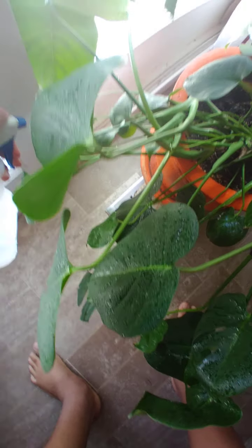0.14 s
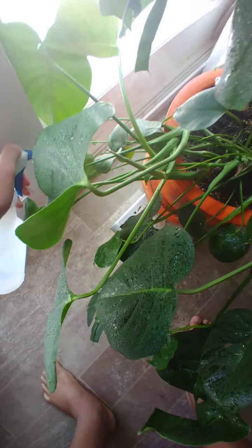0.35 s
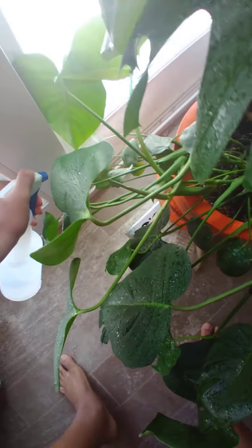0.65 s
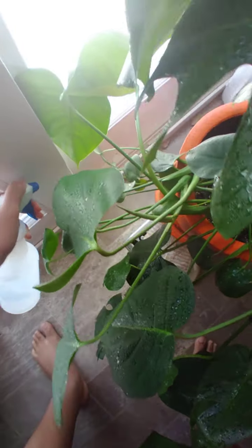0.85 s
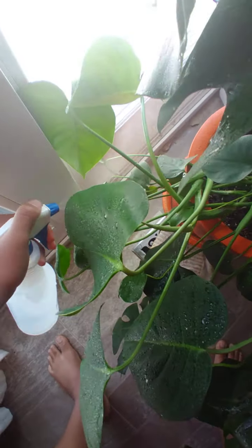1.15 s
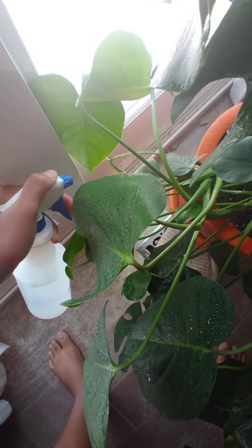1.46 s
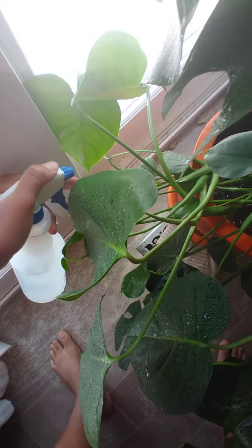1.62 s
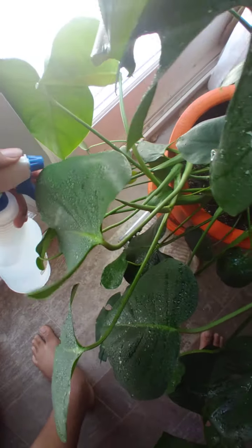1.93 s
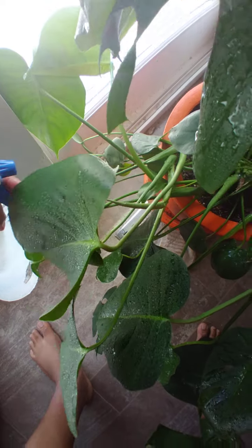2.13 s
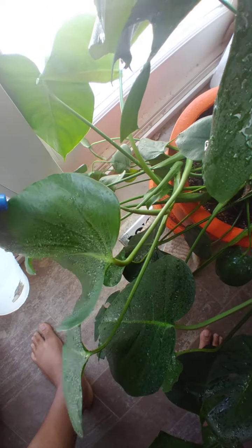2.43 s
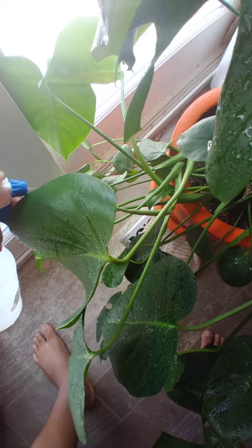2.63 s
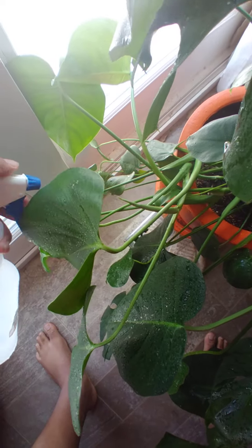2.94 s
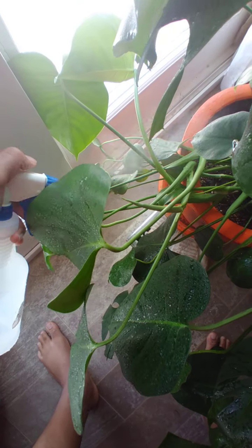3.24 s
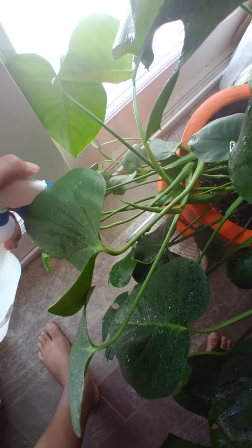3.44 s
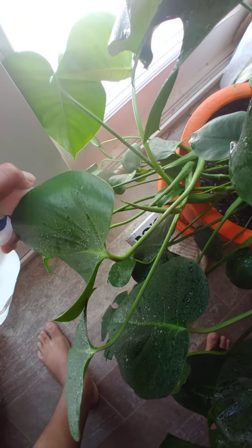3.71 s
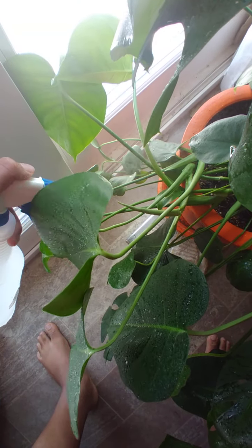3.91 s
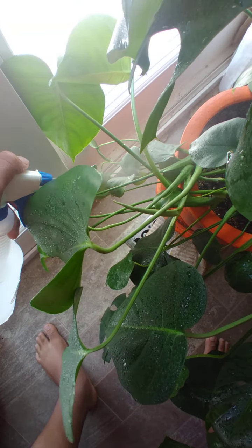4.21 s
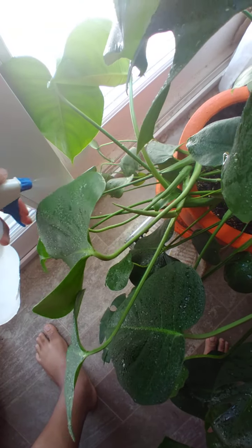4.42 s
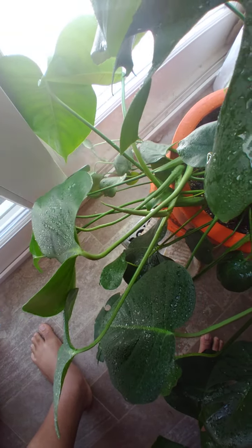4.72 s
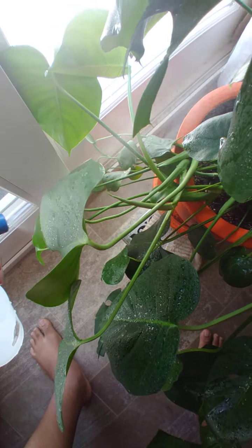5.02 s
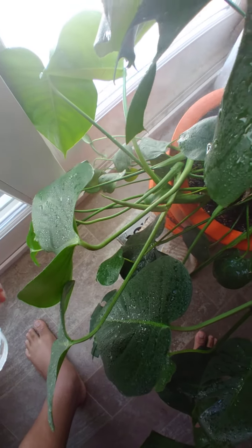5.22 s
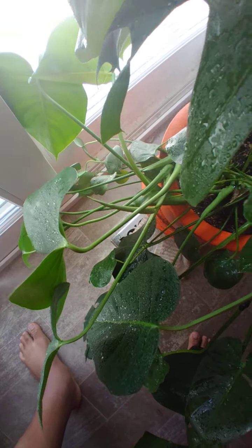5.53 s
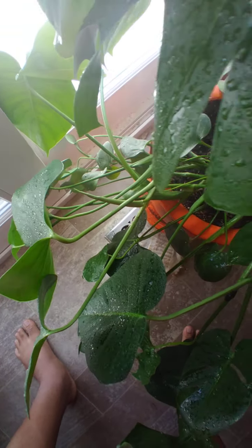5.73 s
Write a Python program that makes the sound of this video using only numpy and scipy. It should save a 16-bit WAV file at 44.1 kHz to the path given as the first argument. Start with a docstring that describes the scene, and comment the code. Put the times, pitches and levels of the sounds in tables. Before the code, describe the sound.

A trigger spray bottle squirts three quick hissing bursts, pauses with small clicks, then six more rapid squirts in a quiet room.

```python
"""A plastic trigger bottle mists house plants near a hand-held phone in a small quiet room.
Each squeeze is coloured noise that swells and sags with pump pressure, peaked where a leaf resonates.
Clicks are noise snaps over damped modes; fizzing and sputtering noise follows pump flow and spits.
Leaves knock (noise humps), low thuds ring as damped modes, the bottle creaks, air puffs mostly at the left port.
Room tone and hum lie beneath, and both microphone ports ring near 9 kHz."""
import sys
import numpy as np
from scipy import signal
from scipy.fft import rfft, irfft, next_fast_len
from scipy.io import wavfile
from scipy.ndimage import map_coordinates

SR = 44100
rng = np.random.default_rng(int(sys.argv[2]) if len(sys.argv) > 2 else 0)


def log_audio(samples):
    """Write samples as a 16-bit WAV file to the path given in sys.argv[1]."""
    # one column per channel
    frames = np.atleast_2d(samples).T
    # limit to full scale, then quantise
    limited = np.clip(frames, -1, 1)
    pcm = np.round(limited * 32767).astype(np.int16)
    wavfile.write(sys.argv[1], SR, pcm)


N = 258426

# Faint noise of the room. Each row: frequency in Hz, relative level in dB.
ROOM_TONE_COLOUR = [(25, -23), (60, 0.5), (110, -16.5), (250, -12.5), (420, -18.5), (900, -26),
                    (2500, -32.5), (5000, -33), (9000, -37.5), (16000, -46)]
# Hum of an appliance. Each row: frequency in Hz, rms level in dB.
HUM_TONES = [(59.7, -84), (236, -91), (296.5, -85.5)]
# Squeezes of the trigger. Each row: start of full flow in seconds, time to peak pressure in seconds,
# length in seconds, relative level in dB, coarse drops in dB, left-right difference in dB before the lean,
# then the resonance of the leaf under the spray: frequency in Hz, width in Hz, height in dB.
SQUEEZES = [ (0.033, 0.083, 0.21, -25.5, -9.5, -2, 2790, 570, 8.5),
            (0.476, .084, 0.19, -26.5, -8, -2, 2830, 700, 4),
            (0.937, 0.099, 0.2, -27, -5.5, -1.4, 1950, 910, -0.5),
            (3.07, 0.088, 0.23, -26, -7.5, -2, 3450, 925, 6.5),
            (3.532, 0.11, 0.25, -27, -5, -1.9, 3240, 1100, 5),
            (3.985, 0.11, 0.21, -26.5, -5, -2.1, 3500, 800, 4),
            (4.414, 0.085, 0.21, -26, -8, -1.7, 5430, 820, 2),
            (4.866, 0.087, 0.21, -24.5, -6.5, -1.6, 3400, 1800, 1.5),
            (5.289, 0.072, 0.22, -27.5, -6.5, 1.2, 1900, 950, 4.5), ]
# Spectrum of the droplets. Each row: frequency in Hz, relative level in dB.
MIST_COLOUR = [(200, -44.5), (450, -33.5), (800, -15), (1300, -7), (2000, 1), (2600, -1.5), (3300, 2.5),
               (4400, 0.5), (5800, 1), (6800, 0.5), (9300, 2), (12000, -2), (14000, -0.5), (16000, -2)]
# Trigger and valve clicks. Each row: start in seconds, relative level in dB, share of the body in dB,
# left-right difference in dB before a common offset and the lean.
CLICKS = [(0.3135, -31, -31, -1), (0.363, -45.5, -40, -14), (0.425, -42, -30, -12.5),
          (0.7317, -28.5, -19, 15), (0.7855, -46, -4, 4), (0.8598, -41.5, -27, 9.5), (1.2168, -31, -45, -5),
          (1.286, -40.5, -15, -2), (1.8451, -39.5, -17, -3), (2.034, -39, -24, 5.5),
          (2.2712, -47, -18, -15), (2.332, -55, -17, -2), (2.4736, -36.5, -18.5, 1),
          (2.601, -46.5, -47, -13.5), (2.9388, -36, -42, -7.5), (2.9872, -57.5, 2, 3),
          (2.9972, -39, -42, -14), (3.371, -27.5, -39, -3), (3.4055, -43, -9, 1), (3.445, -25.5, -34, -2),
          (3.455, -29.5, -26, -6), (3.468, -30, -38, 6), (3.8626, -36.5, -14, -1), (3.895, -40, -18, 5),
          (3.907, -25.5, -26.5, 5.5), (3.921, -29.5, -19, -12), (3.964, -25.5, -37, 6),
          (4.3178, -27, -30, -9), (4.335, -41, -36, -5), (4.6944, -31, -46.5, 8), (4.7524, -39, -39.5, -17),
          (4.7674, -24.5, -32, -2), (5.153, -38, -35, 1), (5.2594, -18, -29, -3.5),
          (5.6415, -49.5, -15, 6.5), (5.66, -37.5, -30, -4), (5.758, -60.5, 3, -5),
          (5.8189, -27.5, -13, -5.5)]
# Spectrum of a click's snap. Each row: frequency in Hz, relative level in dB.
SNAP_COLOUR = [(300, -43), (1100, -21), (1700, -9.5), (5000, 0.5), (9000, 6), (12000, 1), (16000, -0.5)]
# Modes of the spray head. Each row: mean frequency in Hz, mean relative level in dB, t60 in seconds.
SPRAY_HEAD_MODES = [(1570, -2.5, 0.019), (2050, 1.5, 0.015), (2930, -15.5, 0.022), (3980, -8, .012)]
# The pump refilling and weak half strokes. Each row: start in seconds, length in seconds, relative level in dB.
PUMP_STROKES = [(0.333, 0.031, -59.5), (0.773, 0.078, -50), (1.243, 0.041, -57), (1.91, 0.078, -53.5),
                (2.153, 0.056, -67), (2.622, 0.083, -69), (2.808, 0.074, -49), (2.937, 0.032, -65),
                (3.355, 0.081, -57), (4.707, 0.13, -55), (5.548, 0.095, -54.5)]
# Spits of water left in the nozzle. Each row: start in seconds, relative level in dB, t60 in seconds.
SPITS = [(0.734, -35, 0.11), (1.222, -48, 0.068), (2.036, -63.5, 0.19), (2.266, -55, 0.091),
         (5.155, -46, 0.066), (5.263, -50, 0.034)]
# Soft knocks of leaves and bottle. Each row: start in seconds, relative level in dB, pitch in Hz, t60 in seconds.
KNOCKS = [(.612, -42.5, 920, 0.14), (0.637, -42, 1020, 0.16), (0.678, -39.5, 880, 0.093),
          (0.737, -44, 1520, 0.26), (0.83, -52, 913, 0.11), (1.685, -45, 650, 0.039),
          (2.627, -55, 520, 0.072), (3.404, -35.5, 710, 0.024), (3.5, -46, 1290, .04)]
# Low thuds at the phone, from bumps or puffs of air. Each row: start in seconds, relative level in dB.
THUDS = [(0.618, -50), (0.636, -37), (0.651, -34), (0.734, -52), (0.762, -55), (0.803, -58), (1.479, -58),
         (1.586, -59.5), (1.643, -60.5), (1.953, -63), (3.406, -57), (3.499, -59)]
# Modes of the low thuds. Each row: mean frequency in Hz, mean relative level in dB, t60 in seconds.
THUD_MODES = [(69.5, -17, 0.045), (157.6, -1, 0.088), (207.6, 2, 0.092)]
# Air drifting over the ports, one curve per draught. Each row of a curve: time in seconds, relative level in dB.
DRAUGHTS = [
    [(1.4, -101.5), (1.46, -52.5), (1.48, -48), (1.53, -66.5), (1.556, -56.5), (1.694, -59), (1.746, -90),
     (1.78, -86)],
    [(4.76, -73), (4.9, -53), (5.02, -61), (5.078, -77), (5.29, -61.5), (5.304, -54), (5.414, -57),
     (5.448, -62), (5.528, -50.5), (5.546, -57.5), (5.662, -68), (5.758, -60.5), (5.832, -75.5),
     (5.86, -63)],
]
# Spectrum of the moving air. Each row: frequency in Hz, relative level in dB.
PUFF_COLOUR = [(25, -17), (60, 8.5), (100, 4), (160, -10), (260, -11), (450, -39.5), (1200, -42.5),
               (4000, -58)]
# The plastic bottle creaks in the grip. Each row: time of the peak in seconds, relative level in dB.
CREAKS = [(2.164, -69.5), (2.273, -60.5), (2.334, -67.5), (2.481, -64.5), (2.989, -64.5)]
# Spectrum of the creaks. Each row: frequency in Hz, relative level in dB.
CREAK_COLOUR = [(700, -49), (1400, -13.5), (1800, -6.5), (2900, 4.5), (4000, -6), (6000, -6.5),
                (12000, -25)]
# Likeness of the two channels of a noise. Each row: frequency in Hz, correlation from 0 to 1.
LIKENESS = [(200, .8), (1000, 0.26), (2500, 0.17), (6000, 0.17), (12000, 0.22)]
# Stereo lean of the bottle. Each row: frequency in Hz, left-right difference in dB.
BOTTLE_LEAN = [(500, -1.5), (2000, 4), (3500, 1), (5000, -0.5), (7000, -2.5), (9300, -3.5), (12000, -6.5),
               (16000, -3)]
# Decay of the reverberation. Each row: frequency in Hz, t60 in seconds.
WALL_DECAY = [(200, 0.44), (2000, 0.26), (9000, 0.11), (16000, 0.083)]
# Resonances of the left, then the right port. Each row: frequency in Hz, width in Hz, height in dB.
PORT_RESONANCES = [(9140, 2000, 13), (9470, 1260, 15)]

OPEN_DB_PER_S, CLOSE_DB_PER_S = 931, 360  # how fast the valve opens, and how fast the flow dies
SWELL_DB, SAG_DB = 10.5, 9.5  # pressure builds up to its peak, then sags as the piston runs out
COARSE_START_DB, COARSE_END_DB = 3, 3.5  # low pressure makes bigger drops at both ends of a stroke
FIRST_DROPS_S, FIRST_DROPS_DB = 0.031, -12.5  # while the valve opens, only the finest mist gets through
LAST_DROPS_S, LAST_DROPS_DB = 0.24, 5.5  # the dying flow is the coarsest
TICK_DB, TICK_SPREAD_DB, TICK_BODY_DB = -46.5, 3.5, -25  # ticks of the returning spring, as relative levels
RETURN_FROM_S, RETURN_TO_S = 0.16, 0.22  # when the ticks fall, after the end of a squeeze
CREAK_RISE_DB_PER_S, CREAK_FALL_DB_PER_S = 1200.5, 501.5
PORT_LAG_S = 0.00018  # the bottle's sound reaches the left port later
TOP_HZ = 15850  # band limit


def amp(db):
    """Definition of the decibel: twenty decibels are a tenfold amplitude."""
    return 10 ** (np.asarray(db) / 20)


def unit(x):
    """Normalisation by mean power: x at rms 1."""
    return x / np.sqrt(np.mean(x ** 2) + 1e-20)


def along(points, hz):
    """Logarithmic frequency scale: (Hz, value) points interpolated on a log axis."""
    f, v = np.transpose(points)
    return np.interp(np.log(hz + 1), np.log(f + 1), v)


def curve(rows, outside=-140):
    """Level envelope: (seconds, dB) points joined by straight lines, per sample."""
    s, db = np.transpose(rows)
    return np.interp(np.arange(N) / SR, s, db, left=outside, right=outside)


def wobble(rate):
    """Band-limited fluctuation: a smooth curve through random knots, rate of them a second."""
    knots = rng.standard_normal(int(N * rate / SR) + 4)
    return map_coordinates(knots, [np.arange(N) * rate / SR])


def filtered(x, response):
    """Linear filtering: the spectrum of x times a response of frequency."""
    n = x.shape[-1]
    m = next_fast_len(n + SR // 10)
    spectrum = rfft(x, m)
    return irfft(spectrum * response(np.fft.rfftfreq(m, 1 / SR)), m)[..., :n]


def noise(colour, size=N):
    """Partial coherence: coloured noise of rms 1, its channels more alike in the bass than the treble."""
    def mid_side(hz):
        angle = np.arccos(np.clip(along(LIKENESS, hz), -1, 1)) / 2
        return amp(along(colour, hz)) * [np.cos(angle), np.sin(angle)]

    mid, side = filtered(rng.standard_normal((2, size)), mid_side)
    return unit(np.array([mid + side, mid - side]))


def add(track, s, sound):
    """Superposition: a sound is mixed into the track at time s."""
    part = track[:, max(round(s * SR), 0):][:, :sound.shape[-1]]
    part += sound[..., :part.shape[-1]]


def resonance(f, hz, width_hz, db):
    """Damped second-order resonance: a causal peak on a flat response."""
    damping = 1j * f * width_hz
    return 1 + (amp(db) - 1) * damping / (hz * hz - f * f + damping)


def spread(pan_db):
    """Interchannel level difference, shared equally between left and right gains."""
    return amp(pan_db * np.array([[.5], [-.5]]))


def ring(modes, t):
    """Modal decay: damped sines, excited at new strengths and slightly new pitches."""
    total = 0
    for hz, db, t60 in modes:
        decay = amp(db + rng.normal(0, 2.5) - 60 * t / t60)
        total = total + decay * np.sin(2 * np.pi * hz * rng.normal(1, .03) * t)
    return total


def room(x):
    """Reverberation: a short diffuse tail from walls and window, treble dying first."""
    hz, t, z = signal.stft(rng.standard_normal((2, SR // 3)), SR, nperseg=256)
    decay = amp(-60 * t / along(WALL_DECAY, hz)[:, None])
    tail = signal.istft(z * decay, SR, nperseg=256)[1]
    return signal.fftconvolve(x, tail / np.linalg.norm(tail[0]), axes=1)[:, :N]


def background(floor_db=-79.5):
    """Stationary noise and tones: faint room tone with the hum of an appliance, its phase drifting."""
    t = np.arange(N) / SR
    hum = 0
    for hz, db in HUM_TONES:
        phase = 2 * np.pi * hz * t + 0.63 * wobble(1.4)
        hum = hum + amp(db) * np.sqrt(2) * np.sin(phase)
    return hum + amp(floor_db) * noise(ROOM_TONE_COLOUR)


def stroke(t, peak_s, length_s):
    """Pressure-driven flow, in dB: the valve opens, pressure swells and sags, the flow dies."""
    pressure = np.interp(t, [0, peak_s, length_s], [-SWELL_DB, 0, -SAG_DB])
    opening = OPEN_DB_PER_S * np.minimum(t, 0)
    closing = CLOSE_DB_PER_S * np.maximum(t - length_s, 0)
    return pressure + opening - closing


def leaves(x, echo=0.2, reach_s=0.005, count=6):
    """Comb interference: weak copies from near leaves, different at each port, ripple the spectrum."""
    out = x.copy()
    for side, lags in enumerate(rng.uniform(.1, 1, (2, count))):
        for lag in lags:
            out[side] += echo * rng.choice([-1, 1]) * np.roll(x[side], round(lag * reach_s * SR))
    return unit(out)


def jet(flutter_db=0.5, surge_db=-0.48, drop_db=1.02, level_db=-4.0):
    """Atomisation: the nozzle tears water into droplets; every squeeze is aimed at another leaf."""
    out, clock = np.zeros((2, N)), np.arange(N) / SR
    # the sheet of water surges, flutters and bursts into single drops
    tearing_db = surge_db * wobble(66) + flutter_db * wobble(600) + drop_db * wobble(4000)
    tearing = unit(amp(tearing_db))
    for s, peak_s, length_s, db, coarse_db, pan_db, leaf_hz, width_hz, leaf_db in SQUEEZES:
        live = (clock > s - .06) & (clock < s + .45)
        t = clock[live] - s
        mist = leaves(noise(MIST_COLOUR, size=len(t))) * tearing[live]
        mist = filtered(mist, lambda hz: resonance(hz, leaf_hz, width_hz, leaf_db))
        # coarser drops fill out the low middle
        coarse = filtered(mist, lambda hz: 1 / (1 + (hz / 4300) ** 6))
        drop_times = [-FIRST_DROPS_S, 0, peak_s, length_s, length_s + LAST_DROPS_S]
        drop_levels = [FIRST_DROPS_DB, COARSE_START_DB, 0, COARSE_END_DB, LAST_DROPS_DB]
        share = amp(coarse_db + np.interp(t, drop_times, drop_levels))
        flow = amp(db + level_db + stroke(t, peak_s, length_s))
        out[:, live] += flow * spread(pan_db) * (mist + coarse * (share - 1))
    return out


def spring_ticks(count=2):
    """Spring recoil: faint ticks at random times after each squeeze, as rows like those of CLICKS."""
    rows = []
    for s, _, length_s, *_ in SQUEEZES:
        for when, force in rng.random((count, 2)):
            tick_s = s + length_s + RETURN_FROM_S + when * (RETURN_TO_S - RETURN_FROM_S)
            rows.append((tick_s, TICK_DB + TICK_SPREAD_DB * (2 * force - 1), TICK_BODY_DB, 0))
    return rows


def trigger(snap_t60=0.016, rise_s=0.0014, swell_s=0.0011, snap_db=-12.0, body_db=1, usual_pan_db=-4):
    """Impact excitation: each click is a short snap; the plastic spray head takes a moment to ring up."""
    out, t = np.zeros((2, N)), np.arange(SR // 12) / SR
    for s, db, low_db, pan_db in CLICKS + spring_ticks():
        snap_envelope = amp(snap_db - 60 * t / snap_t60) * (1 - np.exp(-t / rise_s))
        snap = snap_envelope * noise(SNAP_COLOUR, size=len(t))
        ringing = np.array([ring(SPRAY_HEAD_MODES, t), ring(SPRAY_HEAD_MODES, t)])
        body = amp(body_db + low_db) * (1 - np.exp(-(t / swell_s) ** 2)) * ringing
        add(out, s, amp(db) * spread(pan_db - usual_pan_db) * (snap + body))
    return out


def pump(fizz_db=1.4, suck_db=-7, peak_share=0.43, spit_db=-4, spit_rise_s=0.00079, sputter_db=2):
    """Turbulent valve flow: water fizzes through the valve as the pump refills, and the nozzle sputters."""
    clock = np.arange(N) / SR
    flow = 0
    for s, length_s, db in PUMP_STROKES:
        flow = flow + amp(db + suck_db + stroke(clock - s, peak_share * length_s, length_s))
    spits, t = np.zeros((2, N)), np.arange(SR // 8) / SR
    for s, db, t60 in SPITS:
        add(spits, s, amp(db + spit_db - 60 * t / t60) * (1 - np.exp(-t / spit_rise_s)))
    fizz = unit(noise(MIST_COLOUR) * amp(fizz_db * wobble(780)))
    sputter = unit(noise(MIST_COLOUR) * amp(sputter_db * wobble(500)))
    return flow * fizz + spits * sputter


def soft_onset(t, soft_s=0.0014):
    """Finite rise time: a soft excitation takes a moment to reach full strength."""
    return 1 - np.exp(-t / soft_s)


def knocks(level_db=-7, narrow_t60=0.073):
    """Heavy damping: leaves knock against bottle and phone with a broad hump instead of a note."""
    out, t = np.zeros((2, N)), np.arange(SR // 6) / SR
    for s, db, hz, t60 in KNOCKS:
        hump = [(hz * 0.3, -22), (hz * 0.79, -7), (hz, 0), (hz * 1.41, -11), (hz * 4, -33), (hz * 12, -70)]
        # below narrow_t60, the shorter the knock, the broader its hump
        hump = [(f, level * min(t60 / narrow_t60, 1)) for f, level in hump]
        envelope = amp(db + level_db - 60 * t / t60) * soft_onset(t)
        add(out, s, envelope * noise(hump, size=len(t)))
    return out


def thuds(level_db=-5):
    """Modal response to a soft push: bumps or puffs of air at the phone give a short low ring."""
    out, t = np.zeros((2, N)), np.arange(SR // 6) / SR
    for s, db in THUDS:
        add(out, s, amp(db + level_db) * soft_onset(t) * ring(THUD_MODES, t))
    return out


def draught(lump_db=3.0, left_db=5.5, right_db=-14):
    """Turbulent pressure at an opening: eddies rumble in the left port, far weaker in the right."""
    air = sum(amp(curve(rows)) for rows in DRAUGHTS)
    eddies = unit(noise(PUFF_COLOUR) * amp(lump_db * wobble(35)))
    return air * eddies * amp([[left_db], [right_db]])


def creaks(level_db=-1, grain_db=5):
    """Strain release: the gripped plastic creaks in grainy noise that rises and falls exponentially."""
    clock = np.arange(N) / SR
    strain = 0
    for s, db in CREAKS:
        slope_db = np.minimum(CREAK_RISE_DB_PER_S * (clock - s), CREAK_FALL_DB_PER_S * (s - clock))
        strain = strain + amp(db + slope_db)
    return amp(level_db) * strain * unit(noise(CREAK_COLOUR) * amp(grain_db * wobble(350)))


def toward_right_port(hz):
    """Interchannel level and time differences: the bottle faces the right port and lags at the left."""
    lag = np.exp(np.pi * hz * PORT_LAG_S * np.array([[-1j], [1j]]))
    return spread(along(BOTTLE_LEAN, hz)) * lag


def scene():
    """Superposition of direct and reverberant sound: bottle, knocks, thuds, creaks, draughts, background."""
    mist, clicks = jet() + pump(), trigger()
    bottle = mist + clicks + room(amp(-12.0) * mist + amp(-10.5) * clicks)
    bottle = filtered(bottle, toward_right_port)
    handling = knocks() + thuds() + creaks()
    return bottle + handling + amp(-13.5) * room(handling) + draught() + background()


def record(dry):
    """Cavity resonance: each microphone port has one treble peak; a steep band limit cuts the top."""
    def response(hz):
        ports = np.array([resonance(hz, *row) for row in PORT_RESONANCES])
        return ports / (1 + (hz / TOP_HZ) ** 200)

    return filtered(dry, response)


dry = scene()
out = record(dry)
log_audio(out)
```